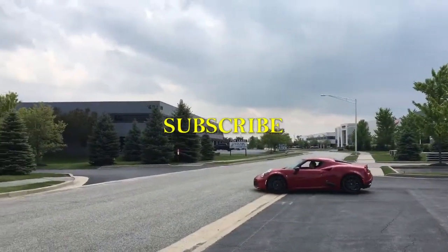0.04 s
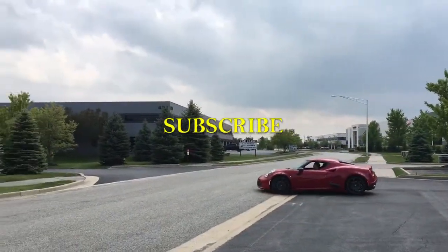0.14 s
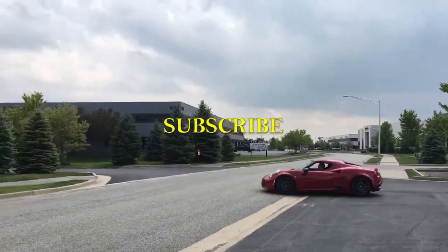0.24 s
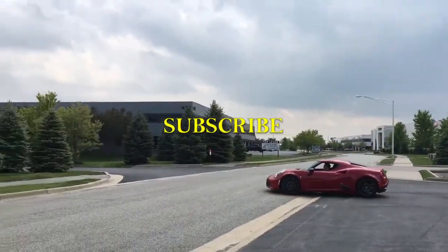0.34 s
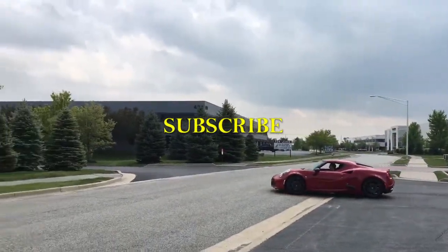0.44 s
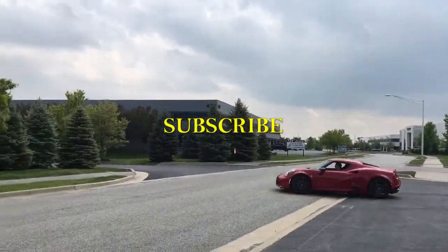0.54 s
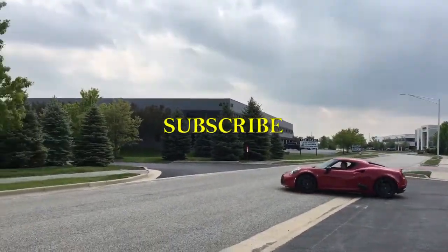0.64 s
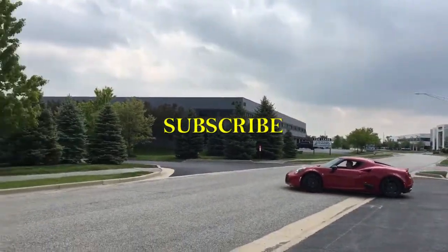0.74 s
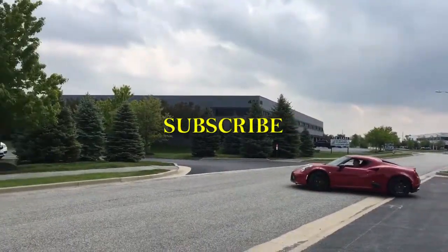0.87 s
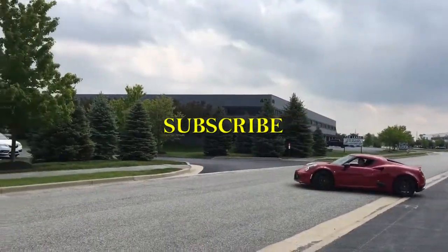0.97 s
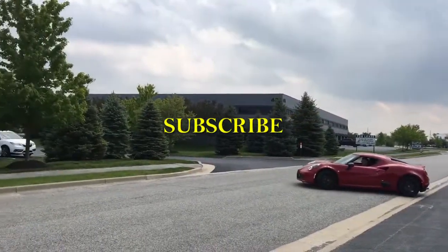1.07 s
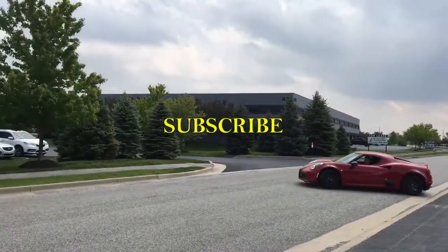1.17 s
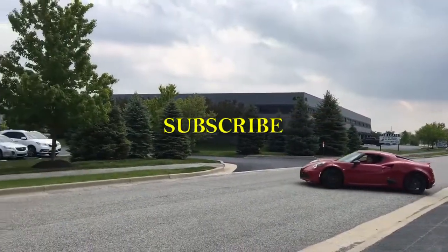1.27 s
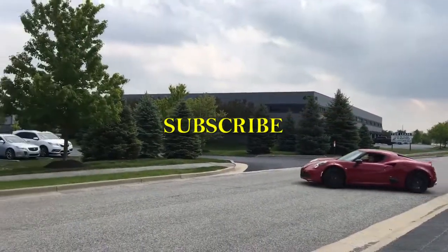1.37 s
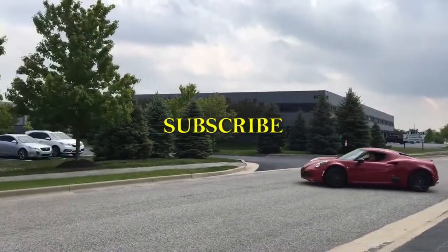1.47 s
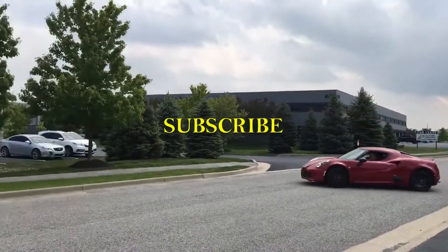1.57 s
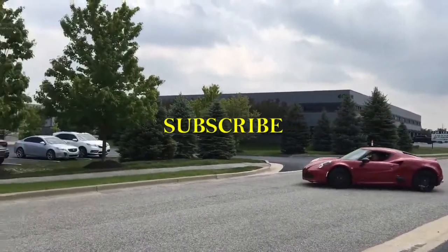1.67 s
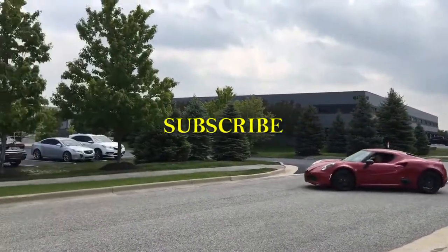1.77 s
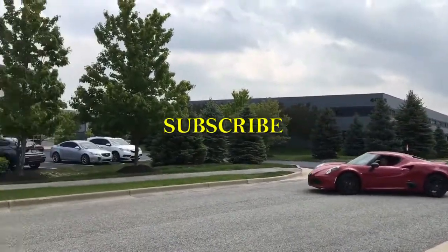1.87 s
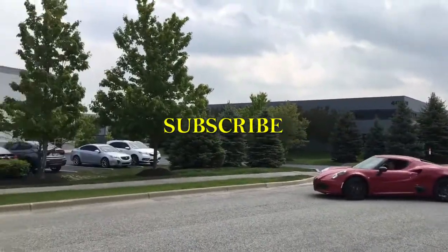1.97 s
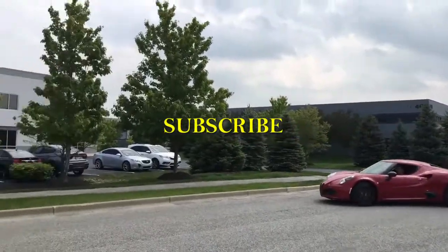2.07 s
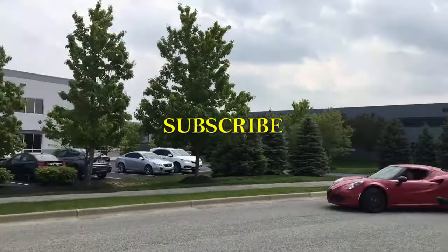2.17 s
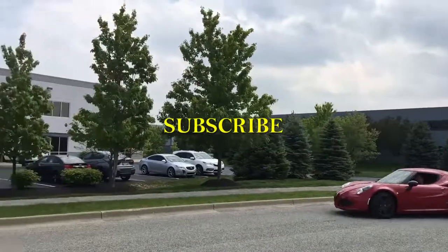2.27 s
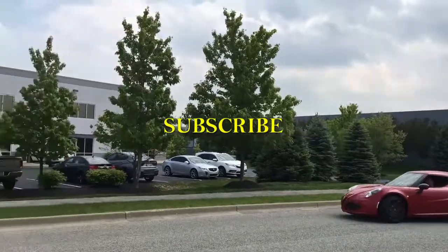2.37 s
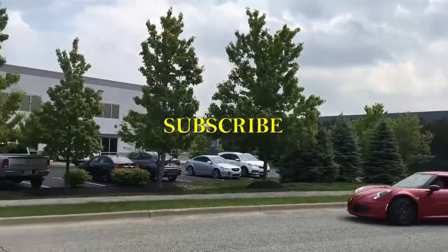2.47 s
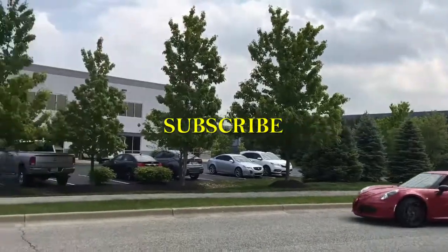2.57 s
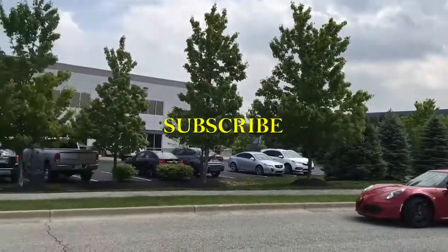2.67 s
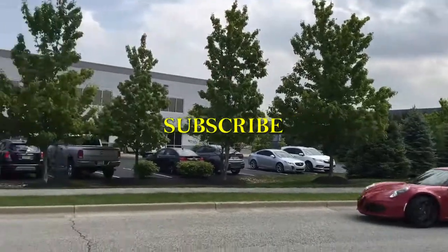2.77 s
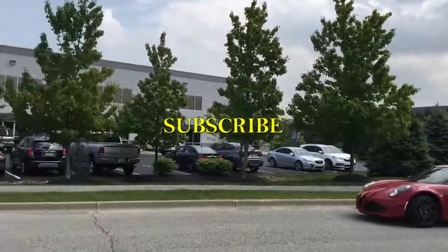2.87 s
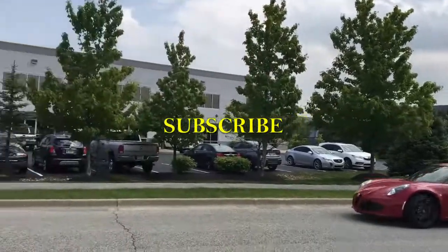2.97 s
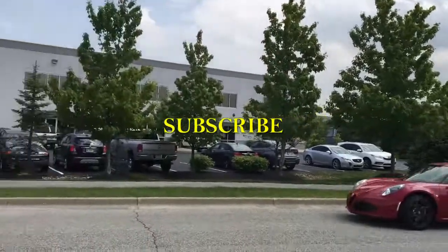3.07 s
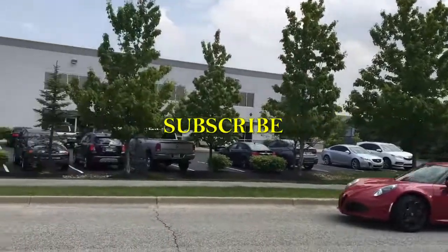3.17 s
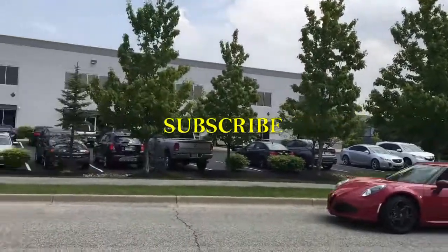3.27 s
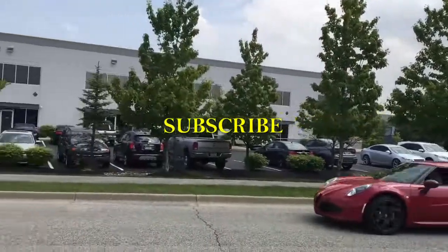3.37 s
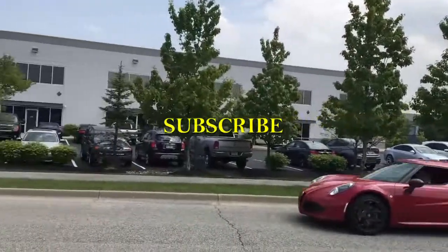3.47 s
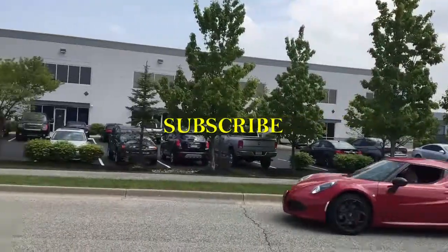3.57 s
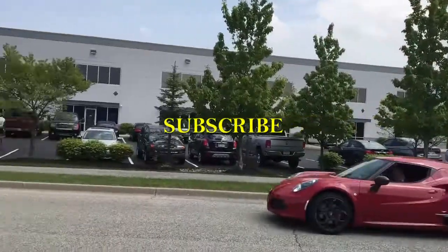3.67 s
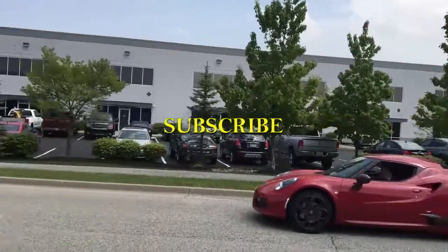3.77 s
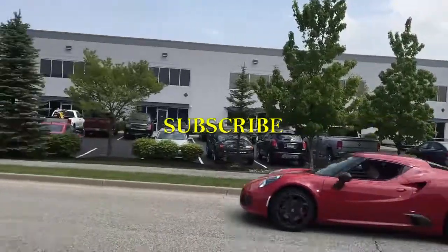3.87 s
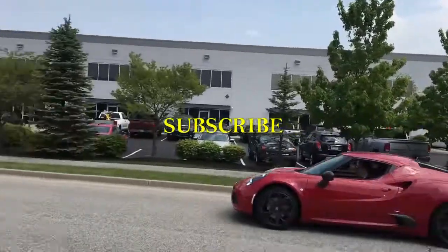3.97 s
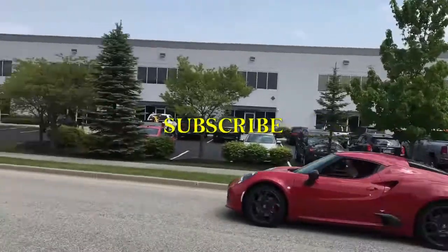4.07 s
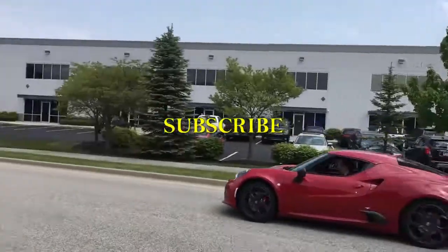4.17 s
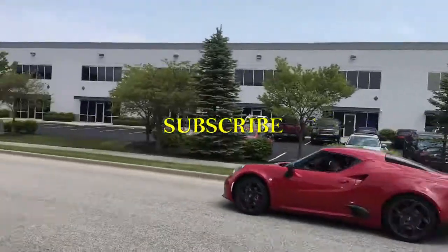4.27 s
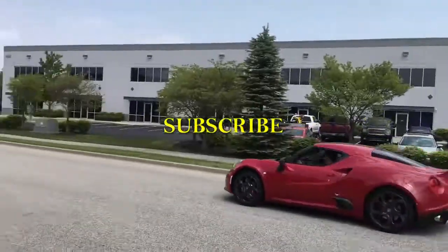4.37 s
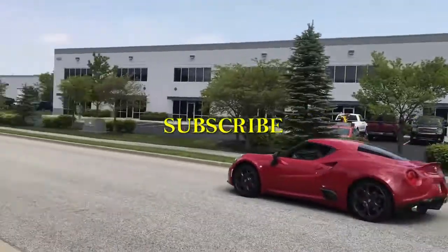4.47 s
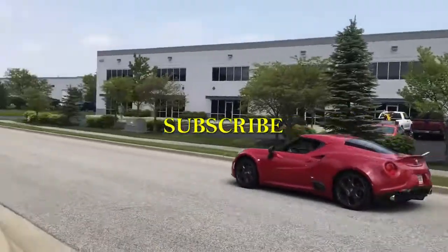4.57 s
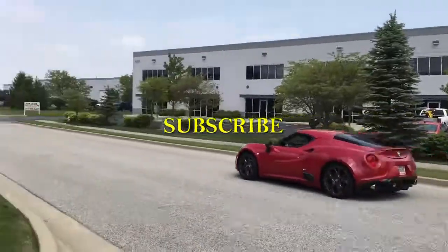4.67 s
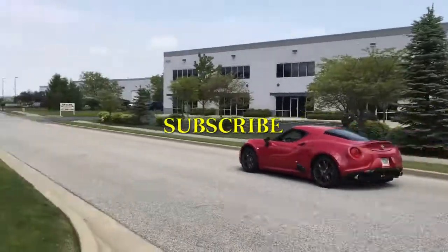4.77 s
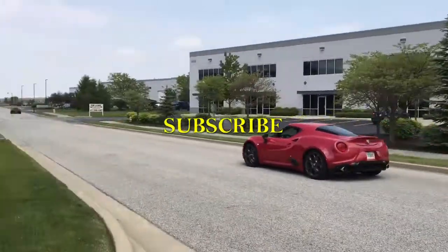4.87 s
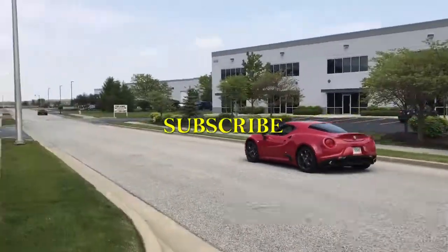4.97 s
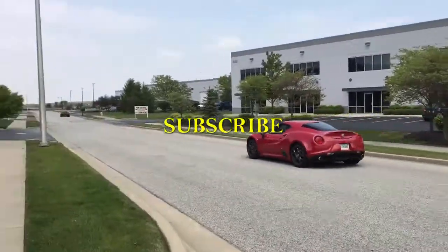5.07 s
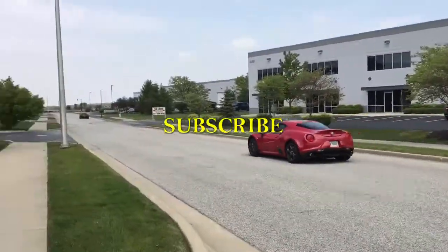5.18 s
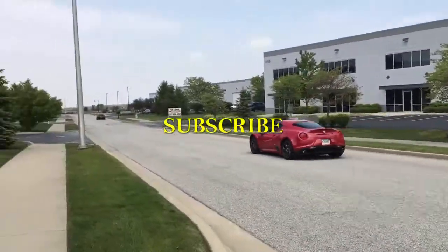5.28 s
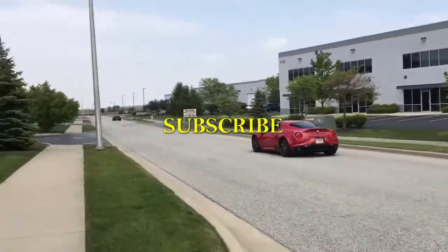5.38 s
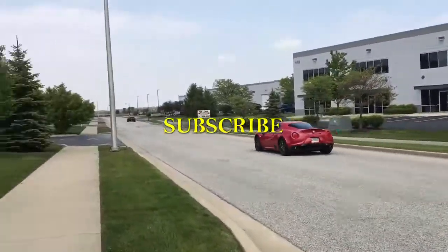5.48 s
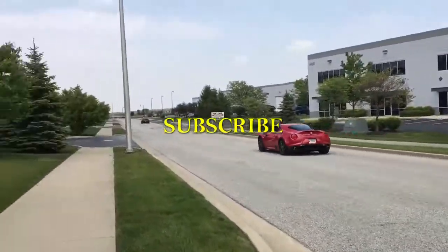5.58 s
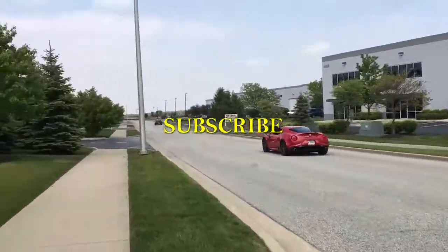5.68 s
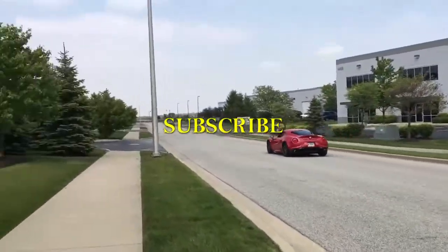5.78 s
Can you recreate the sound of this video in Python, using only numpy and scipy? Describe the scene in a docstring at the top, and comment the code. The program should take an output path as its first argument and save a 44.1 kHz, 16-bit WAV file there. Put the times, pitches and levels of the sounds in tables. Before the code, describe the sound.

Outdoors on a wide street, a single turbocharged four-cylinder sports car approaches with a low, uneven drone and hard clatter. Grit snaps under the tyres. Revs climb to a loud, raspy close pass, then the exhaust bangs rapidly during an upshift. The engine resumes lower in second gear and pulls away with a hiss from the tailpipes. A handheld microphone at the roadside catches light wind buffeting and sparse echoes.

```python
"""A sports car pulls away in first gear, passes close by, bangs through an upshift and drives off in second.
Firing orders drone through exhaust resonances; sharp pulses and puffs of filtered noise bark, rasp and hiss.
Intake, clatter and a thin whine follow the turbocharged four-cylinder's revs.
While the ignition is cut, every other cylinder bangs in the exhaust; then a jet hisses from the tailpipes.
Grit snaps under the tyres, wind buffets the microphone, and sparse decaying echoes answer from the street."""
import sys
import numpy as np
from scipy import signal
from scipy.fft import rfft, irfft
from scipy.io import wavfile
from scipy.ndimage import uniform_filter1d

SR = 44100
rng = np.random.default_rng(int(sys.argv[2]) if len(sys.argv) > 2 else 0)


def file_out(sig):
    """Save sig as 16-bit WAV at sys.argv[1]."""
    # one column per channel
    cols = np.atleast_2d(sig).T
    # limit, then scale
    lim = np.clip(cols, -1, 1)
    pcm = np.round(lim * 32767).astype(np.int16)
    wavfile.write(sys.argv[1], SR, pcm)


N = 257103
T = np.arange(N) / SR

# the car's path: (time [s], distance from the microphone [m])
DISTANCE = [(0, 16.6), (2, 13.75), (3, 8.8), (3.6, 5.24), (3.95, 4.23), (4.4, 7.5), (5, 10.15),
            (5.83, 18.6)]
REFERENCE_M, REFERENCE_HZ = 5, 100  # distance and firing rate at which the engine layers are set
CUT_S = 4.272  # the ignition cut
RASP_BAND, HISS_BAND = (800, 2400), (4800, 14000)  # Hz, where these layers are levelled


def amp(db):
    """Decibels to gain."""
    return 10 ** (np.asarray(db) / 20)


def curves(rows):
    """Each column of a timed table, interpolated at every sample."""
    s, *columns = np.transpose(rows)
    return [np.interp(T, s, column) for column in columns]


def read(points, hz):
    """Reads a spectrum along a logarithmic frequency axis."""
    f, value = np.transpose(points)
    return np.interp(np.log(hz + 1), np.log(f + 1), value)


def evened(x):
    """Scales to rms 1."""
    return x / np.sqrt(np.mean(x ** 2) + 1e-20)


def drift(hz):
    """Slow random wandering up to about hz, rms 1."""
    spectrum = rfft(rng.standard_normal(N))
    rolloff = 1 + (np.fft.rfftfreq(N, 1 / SR) / hz) ** 4
    return evened(irfft(spectrum / rolloff, N))


def colour(x, points, size=8192):
    """Causal minimum-phase filter with the given spectrum."""
    db = np.maximum(read(points, abs(np.fft.fftfreq(size, 1 / SR))), -100)
    log_gain = np.log(amp(db))
    # the Hilbert transform of the log gain supplies the phase
    taps = np.fft.ifft(np.exp(np.conj(signal.hilbert(log_gain)))).real
    return signal.oaconvolve(x, taps[:size // 2])[:N]


def levelled(x, band, size=6000):
    """Holds the running rms inside a band near 1."""
    band_pass = signal.butter(4, band, "bandpass", fs=SR, output="sos")
    inside = signal.sosfilt(band_pass, x)
    power = uniform_filter1d(uniform_filter1d(inside ** 2, size), size)
    return x / np.sqrt(abs(power) + 1e-12)


def ramp(s, length):
    """Rises from 0 to 1 around the time s."""
    return np.clip((T - s) / length + .5, 0, 1)


def swell(peak_s, db, rise_s, fall_s):
    """A bell-shaped gain that rises to db at peak_s and falls away."""
    width_s = np.where(T < peak_s, rise_s, fall_s)
    return amp(db) * np.exp(-((T - peak_s) / width_s) ** 2)


def comb(cycles, order):
    """One pulse a cycle: equal harmonics up to the given order."""
    offset = cycles - np.round(cycles)
    return (order + .5) * np.sinc((2 * order + 1) * offset) / np.sinc(offset) - .5


def puffs(cycles, length, between, spread_db, rise=0.057):
    """Noise swells and dies each cycle with random strength; rise and length are in cycles."""
    chance = np.clip(rng.standard_normal(N), -2.5, 2.5)
    size = amp(spread_db * chance)[cycles.astype(int)]
    age = cycles % 1
    envelope = between + size * (np.exp(-age / length) - np.exp(-age / rise))
    return envelope * rng.standard_normal(N)


def wind():
    """Lumpy low buffeting: filtered noise in a wavering breeze and a few gusts."""
    # gusts on the microphone: (time [s], level [dB], half-length [s])
    gusts = [(0, -33, .08), (.75, -38, .15), (1.25, -42, .2), (2.45, -41, .2), (3.23, -29, .06),
             (3.95, -34, .25), (4.9, -33, .4)]
    # colour of the buffeting: (frequency [Hz], level [dB])
    rumble = [(10, -28.5), (25, -22), (36, -19), (48, -0.5), (80, -3), (150, -7.5), (400, -28.5),
              (2000, -78.5)]
    breeze_db = -39.5
    strength = amp(breeze_db) + sum(swell(s, db, length, length) for s, db, length in gusts)
    return strength * amp(1.2 * drift(2)) * evened(colour(rng.standard_normal(N), rumble))


def street(x):
    """Sparse reflections from trees, parked cars and walls, each frequency decaying at its own rate."""
    # reverberation: (frequency [Hz], time to fall by 60 dB [s])
    decay = [(100, 0.96), (1000, 0.55), (4000, 0.11), (12000, 0.43)]
    reflections = rng.standard_normal(SR) * (rng.random(SR) < .04)
    hz, t, z = signal.stft(reflections, SR, nperseg=256)
    fading = amp(-60 * t / read(decay, hz)[:, None])
    tail = signal.istft(z * fading, SR, nperseg=256)[1]
    tail = signal.sosfilt(signal.butter(2, 350, "highpass", fs=SR, output="sos"), tail)
    return signal.oaconvolve(x, tail / np.linalg.norm(tail))[:N]


def grit():
    """Small stones snap out from under the tyres: decaying bursts of bright noise."""
    # stones: (time [s], nominal peak level [dB])
    stones = [(1.1476, -42), (1.1638, -36), (1.1867, -38), (1.1974, -41), (1.26, -31), (1.2935, -42),
              (1.9435, -35), (2.4947, -45), (2.862, -51)]
    # colour of a snap: (frequency [Hz], level [dB])
    snap = [(1500, -28), (4000, -17), (5800, 4), (8000, -2), (12000, -16), (16000, -17)]
    decay_s = 0.0021
    # the noise's rms starts 9 dB under the nominal peak
    bursts = sum(amp(db - 9.0) * (T >= s) * np.exp(-abs(T - s) / decay_s) for s, db in stones)
    return bursts * evened(colour(rng.standard_normal(N), snap))


def facing():
    """How directly the tailpipes point at the microphone, 0 to 1."""
    in_view = ramp(4.83, length=0.12)
    return in_view * swell(5.18, db=0, rise_s=0.74, fall_s=0.33)


def jet():
    """The exhaust jet hisses in gusts of noise while the tailpipes face the microphone."""
    # colour of the jet: (frequency [Hz], level [dB])
    jet_colour = [(2500, -38), (4300, 10), (5800, 11), (7500, -23), (9300, -16), (11500, -10.5),
                  (15700, -19.5)]
    gusty = amp(-48 + 3.4 * drift(21))
    return facing() * gusty * evened(colour(rng.standard_normal(N), jet_colour))


def whine(firing_hz, multiple=56.2, fuzz=.022):
    """A fuzzy whistle at a fixed multiple of the firing rate, climbing with the revs."""
    whistle_hz = multiple * firing_hz * (1 + fuzz * drift(300))
    return np.sin(2 * np.pi * np.cumsum(whistle_hz) / SR)


def labour():
    """Gain of lope and clatter: the engine labours briefly a few times."""
    # surges: (time [s], level added to the steady gain of 1 [dB], half-length [s])
    surges = [(.1, -6, 0.31), (.78, -3, 0.11), (1.35, -3.5, 0.17), (2.36, -0.5, 0.37)]
    return 1 + sum(swell(s, db, length, length) for s, db, length in surges)


def clatter(cycles):
    """Hard mechanical rattle: a noise burst each firing through ringing resonances."""
    # resonances: (frequency [Hz], level [dB])
    clatter_ring = [(800, -39), (1180, 5.5), (1300, -5.5), (1560, 4.5), (1680, -0.5), (1820, -7.5),
                    (2050, 4.5), (2400, -33), (4000, -42)]
    bursts = puffs(cycles, length=0.39, between=0.16, spread_db=6)
    return labour() * evened(colour(bursts, clatter_ring))


def intake(cycles):
    """Puffs of drawn air ring in the side intake, which beams at the microphone in passing."""
    # resonances: (frequency [Hz], level [dB])
    intake_ring = [(1500, -52), (2200, -2.5), (2400, 8), (2700, -9), (3000, 1), (3250, 5), (3550, -2),
                   (3900, 0), (4450, -10.5), (5000, -31), (6000, -38)]
    air = evened(colour(puffs(cycles, length=0.28, between=0.072, spread_db=-2), intake_ring))
    return air * (1 + swell(3.99, db=7, rise_s=0.095, fall_s=0.095))


def hiss(cycles, hiss_colour):
    """Turbulent gas hisses with each firing and flares as the tailpipes point at the microphone."""
    gas = puffs(cycles, length=0.14, between=0.51, spread_db=7.0)
    return levelled(colour(gas, hiss_colour), HISS_BAND) * (1 + amp(7) * facing())


def unevenness(cycles, scatter):
    """How much stronger than average each firing is: a fixed cylinder pattern plus chance."""
    # the cylinders in firing sequence: (excess strength [fraction])
    cylinders = [0.19, -0.16, 0.045, -0.084]
    firing = np.round(cycles).astype(int)
    return np.take(cylinders, firing % len(cylinders)) + scatter * rng.standard_normal(N)[firing]


def lope(excess, pulses):
    """Unequal firings put weaker lines between the firing orders, heard through the silencer."""
    # the silencer's response: (frequency [Hz], level [dB])
    silencer = [(30, -22.5), (70, -17), (105, -10.5), (123, 14.5), (143, -11), (175, -24.5), (235, -1),
                (295, 1), (350, -12), (450, -16), (600, -8), (800, -54), (2000, -59.5)]
    return labour() * levelled(colour(excess * pulses, silencer), (60, 700))


def exhaust(hz, cycles, excess, pulses, pipe, rasp_colour, pulse_db, rasp_db):
    """Firing pulses bark in the pipe and drive rasping gas; the bark stands out more at high revs."""
    # the bark is what lies above the five droning orders, plus the unequal firings
    bark = levelled(colour((1 + excess) * pulses - comb(cycles, order=5), pipe), RASP_BAND)
    gas = puffs(cycles, length=1.0, between=0.3, spread_db=1.0)
    rasp = levelled(colour(gas, rasp_colour), RASP_BAND)
    clear = hz / hz.max()
    return clear * amp(pulse_db) * bark + amp(rasp_db) * rasp / clear ** 0.46


def drone(hz, cycles, near, effort_db, order_laws, resonances, flutter):
    """Five fluttering sines at the firing orders climb through the exhaust resonances."""
    # the silencer booms as the second order sweeps its resonance: (time [s], level [dB])
    booms = [(.57, -22.5), (1.07, -27.5), (1.2, -33), (1.4, -20.5), (1.56, -19.5), (1.73, -19.5)]
    boom_s = 0.048  # half-length
    # the drone grows less steady as the revs drop below their peak
    unsteady = flutter * (hz.max() / hz) ** 1.72
    total = 0
    for k, (db, share) in enumerate(order_laws, 1):
        size = near * amp(db + share * effort_db + read(resonances, k * hz))
        if k == 2:
            size = size + sum(swell(s, boom_db, boom_s, boom_s) for s, boom_db in booms)
        flutter_gain = 1 + unsteady * drift(48)
        total = total + size * flutter_gain * np.sqrt(2) * np.sin(2 * np.pi * k * cycles)
    return total


def engine(revs, effort, parts, order_laws, resonances, pipe, rasp_colour, hiss_colour,
           pulse_db, rasp_db, scatter, flutter):
    """Each firing drives pulses and puffs of gas; layers follow revs, effort and nearness."""
    hz, effort_db = curves(revs)[0], curves(effort)[0]
    near = REFERENCE_M / curves(DISTANCE)[0]
    gain = {}
    for name, (db, per_octave, share) in parts.items():
        gain[name] = near * amp(db + per_octave * np.log2(hz / REFERENCE_HZ) + share * effort_db)

    # one cycle is one firing, with slight jitter in the rate
    cycles = np.cumsum(hz * (1 + .0015 * drift(40))) / SR
    excess = unevenness(cycles, scatter)
    pulses = comb(cycles, order=44)

    sound = drone(hz, cycles, near, effort_db, order_laws, resonances, flutter)
    sound = sound + gain["lope"] * lope(excess, pulses)
    sound = sound + gain["intake"] * intake(cycles)
    sound = sound + gain["clatter"] * clatter(cycles)
    sound = sound + gain["rasp"] * exhaust(hz, cycles, excess, pulses, pipe, rasp_colour, pulse_db, rasp_db)
    sound = sound + gain["hiss"] * hiss(cycles, hiss_colour)
    return sound + gain["whine"] * whine(hz)


def first_gear():
    """The engine coming, heard from the front and side."""
    # revs: (time [s], firing rate [Hz])
    revs = [(0.0, 47.5), (0.24, 48.9), (0.52, 53.3), (1.0, 59.92), (1.33, 62.49), (2.08, 76.07),
            (2.35, 83.54), (2.57, 85), (3.07, 96.7), (3.49, 115.7), (3.74, 131.5), (4.07, 150.5),
            (4.16, 153.7), (4.26, 153.7)]
    # how hard the engine works, from throttle and boost: (time [s], effort [dB])
    effort = [(0, 4), (.45, -4), (2.1, 0.5), (2.47, 1), (2.62, -4.5), (3.1, -1), (3.3, -8), (3.53, -5),
              (3.73, 5.5), (4.02, 7.5), (4.22, 7)]
    # layers: (level at reference [dB], growth [dB per octave of revs], share [dB per dB of effort])
    parts = dict(rasp=(-30, 3.1, 0.14), hiss=(-48, 7.64, .19), lope=(-28, -5, 0.13),
             intake=(-46.5, 8.8, 0.33), clatter=(-41.5, 0, 0.11), whine=(-54, 5, .2))
    # firing orders 1 to 5: (level [dB], share [dB per dB of effort])
    order_laws = [(0, 0.83), (4, .8), (5, 0.84), (4, 1.65), (2.5, 1.14)]
    # exhaust resonances of the drone: (frequency [Hz], level [dB])
    resonances = [(48, -27.5), (85, -22), (105, -24.5), (140, -25), (160, -30), (200, -26), (230, -20.5),
                  (270, -25.5), (300, -24), (330, -30.5), (450, -39.5), (500, -37.5), (580, -31.5),
                  (620, -32.5), (685, -26.5), (770, -55)]
    # colour of the bark in the pipe: (frequency [Hz], level [dB])
    pipe = [(100, -30.5), (290, 24.5), (345, 16), (400, -7.5), (480, 21), (560, 19), (660, 14.5), (760, -7),
            (860, 4), (980, 6.5), (1150, -6), (1300, -5), (1550, -1), (1800, -14.5), (2300, -12.5),
            (4000, -21)]
    # colour of the rasping gas: (frequency [Hz], level [dB])
    rasp_colour = [(300, -7.5), (500, 7.5), (660, 7.5), (790, -6), (1000, -2.5), (1300, -5), (1800, -7),
                   (2200, -10.5), (2700, -16), (3300, -17), (4400, -19), (5000, -41.5), (7000, -44.5)]
    # colour of the hissing gas: (frequency [Hz], level [dB])
    hiss_colour = [(2650, -23.5), (4500, 0.5), (4940, -5), (6780, -6), (8300, -12), (10400, -20),
                   (12800, -24), (15600, -32)]
    return engine(revs, effort, parts, order_laws, resonances, pipe, rasp_colour, hiss_colour,
                  pulse_db=-1.2, rasp_db=-7, scatter=.06, flutter=.06)


def second_gear():
    """The engine going away, heard from behind."""
    # revs: (time [s], firing rate [Hz])
    revs = [(4.6, 109), (4.704, 106.1), (5.356, 119.4), (5.82, 131.7)]
    # how hard the engine works, from throttle and boost: (time [s], effort [dB])
    effort = [(4.6, -6.5), (4.7, -0.5), (4.872, 4), (5.3, 8), (5.82, 12.6)]
    # layers: (level at reference [dB], growth [dB per octave of revs], share [dB per dB of effort])
    parts = dict(rasp=(-29, 4.3, 0.91), hiss=(-44.5, 3.6, 0.4), lope=(-30.5, -1, 0.12),
             intake=(-42, 4.95, 0.29), clatter=(-38.5, 1.5, 1), whine=(-60, 12, 0.83))
    # firing orders 1 to 5: (level [dB], share [dB per dB of effort])
    order_laws = [(0, 1)] * 5
    # exhaust resonances of the drone: (frequency [Hz], level [dB])
    resonances = [(105, -16), (131, -16.5), (210, -27.5), (225, -23), (241, -15), (262, -29), (345, -24),
                  (385, -40), (425, -38), (460, -31.5), (485, -34), (525, -27), (560, -30.5), (595, -37),
                  (640, -25.5)]
    # colour of the bark in the pipe: (frequency [Hz], level [dB])
    pipe = [(100, -44), (300, -7), (450, -30), (580, 8), (680, 20.5), (770, 3.5), (880, 12), (1030, 16),
            (1150, 0.5), (1280, 7), (1600, -3), (2300, -3.5), (4000, -16.5)]
    # colour of the rasping gas: (frequency [Hz], level [dB])
    rasp_colour = [(300, -5), (600, 9.5), (790, 1), (1000, 1), (1450, -2.5), (2000, -6), (2400, -5.5),
                   (2700, -15), (3300, -14), (4400, -18.5), (5000, -40), (7000, -36.5)]
    # colour of the hissing gas: (frequency [Hz], level [dB])
    hiss_colour = [(2060, -41), (3500, -7), (4350, 3.5), (4870, -5), (5520, 0), (6660, -4.5), (7540, -15.5),
                   (9560, -11.5), (10400, -23), (13200, -26), (15600, -60)]
    return engine(revs, effort, parts, order_laws, resonances, pipe, rasp_colour, hiss_colour,
                  pulse_db=-1.4, rasp_db=-7.5, scatter=.08, flutter=.05)


def upshift():
    """Unburnt fuel bangs once a revolution as revs fall: crack, fizz, ringing pipe and low thump."""
    # how each layer swells and dies: (peak time [s], peak level [dB], rise [s], fall [s])
    bang_swells = dict(thump=(4.32, -14.5, .04, .26), ring=(4.335, -10, .075, .145),
                   crack=(4.365, -28, .16, .115), fizz=(4.41, -38.5, .17, .09))
    # resonances of the ringing pipe: (frequency [Hz], level [dB])
    bang_ring = [(70, -18), (150, -3.5), (215, 4), (290, 11.5), (350, 1.5), (430, -9), (510, -4.5),
                 (585, 2.5), (660, -4.5), (780, -16), (1020, -16), (1250, -32), (1400, -40), (2400, -32),
                 (5000, -58)]
    # colour of the crack: (frequency [Hz], level [dB])
    crack_colour = [(500, 1), (900, 1), (1250, 0.5), (1700, -8.5), (2400, -3), (2800, -11), (3250, -5),
                    (4200, -10.5), (4900, -24), (7000, -32), (15700, -62)]
    # colour of the fizz: (frequency [Hz], level [dB])
    fizz_colour = [(2500, -24), (4500, -7), (6000, 4.5), (8000, -4), (9400, -3), (11000, -14), (15700, -21)]
    bang_hz, sag_hz_per_s, sag_s = 75.27, 72, .33  # rate at the cut; how fast and how long it falls
    pipe_trip_s = .0017
    gain = {name: swell(*shape) for name, shape in bang_swells.items()}
    rate = bang_hz - sag_hz_per_s * np.clip(T - CUT_S, 0, sag_s)
    cycles = np.cumsum(rate) / SR
    # a bang cycle starts exactly at the cut
    cycles += 1 - np.interp(CUT_S, T, cycles) % 1
    strength = 1 + 0.046 * rng.standard_normal(N)[np.round(cycles).astype(int)]

    # a weak front leaves the pipe one round trip ahead of the main blast
    blast = cycles - .17 + 0.008 * drift(78)
    pulses = comb(blast, order=60) + .45 * comb(blast + pipe_trip_s * rate, order=60)
    ring = levelled(colour(-strength * pulses, bang_ring), (180, 900))
    crack_gas = puffs(cycles, length=0.38, between=0.14, spread_db=1.2, rise=.03)
    crack = levelled(colour(crack_gas, crack_colour), (1800, 12000))
    fizz_gas = puffs(cycles, length=0.29, between=0.14, spread_db=-1, rise=0.055)
    fizz = levelled(colour(fizz_gas, fizz_colour), HISS_BAND)
    thump = np.sqrt(2) * np.sin(2 * np.pi * cycles)
    return gain["thump"] * thump + gain["ring"] * ring + gain["crack"] * crack + gain["fizz"] * fizz


def scene():
    """First gear, the banging shift, then second gear, with echoes, grit and wind."""
    cut = ramp(CUT_S, .006)
    resumed = ramp(4.555, 0.032)
    car = (1 - cut) * first_gear() + cut * (1 - resumed) * upshift()
    car = car + resumed * second_gear() + jet()
    # reflections approach a -6 dB share as the car gets farther off than about 5.7 m
    echo = amp(-6) * (1 - np.exp(-(curves(DISTANCE)[0] / 5.7) ** 2))
    return (car + street(echo * car) + grit() + wind())[None]


def record(dry):
    """The recorder rounds off peaks near full scale and limits the band."""
    rounded = dry / (1 + dry ** 6) ** (1 / 6)
    edge_hz = 15750
    low_pass = signal.firwin(511, edge_hz, window=("kaiser", 9), fs=SR)
    return signal.oaconvolve(rounded, low_pass[None], "same")


dry = scene()
out = record(dry)
file_out(out)
```